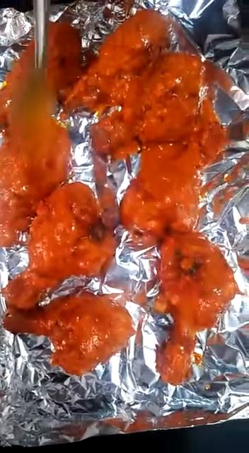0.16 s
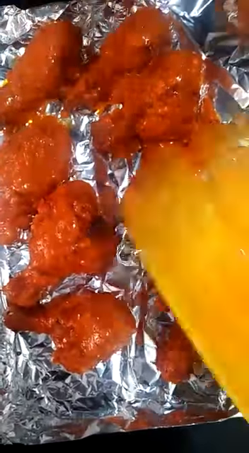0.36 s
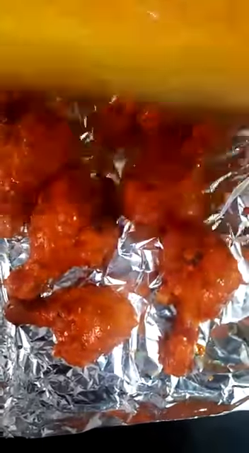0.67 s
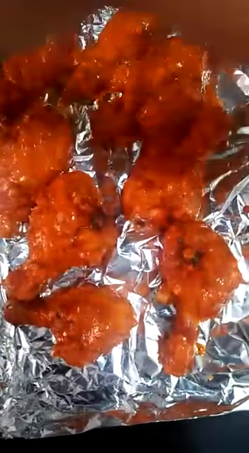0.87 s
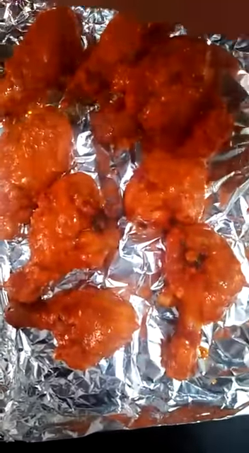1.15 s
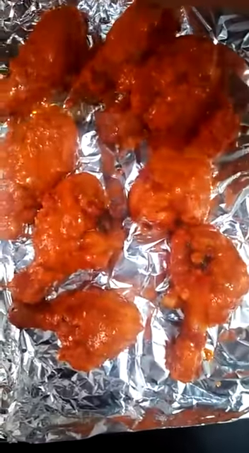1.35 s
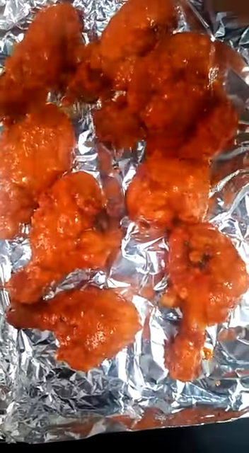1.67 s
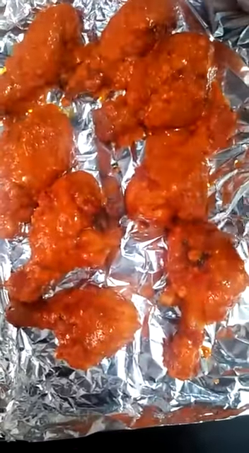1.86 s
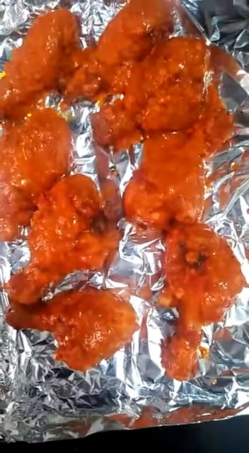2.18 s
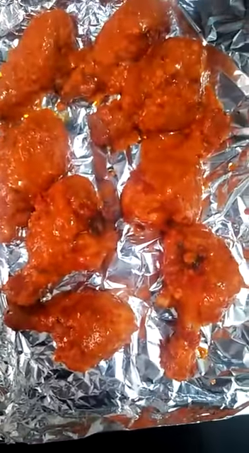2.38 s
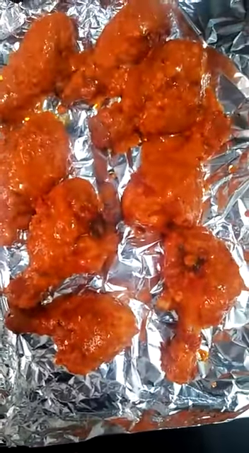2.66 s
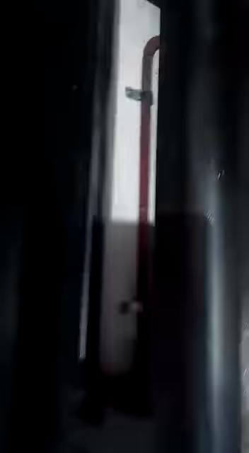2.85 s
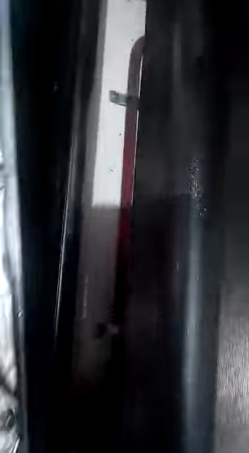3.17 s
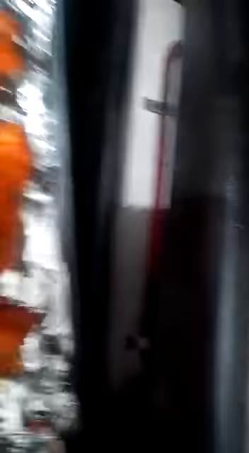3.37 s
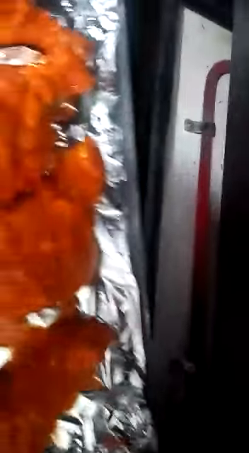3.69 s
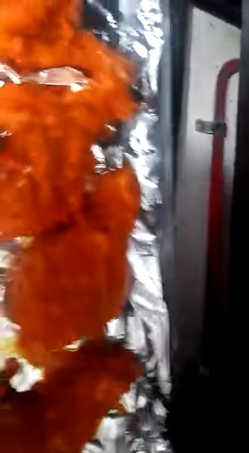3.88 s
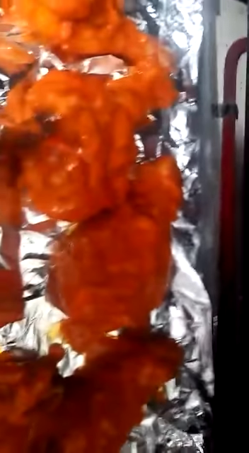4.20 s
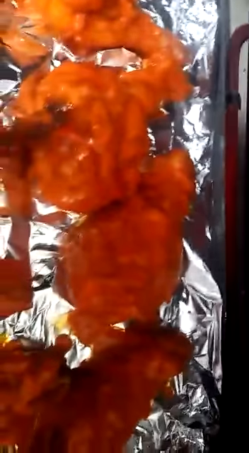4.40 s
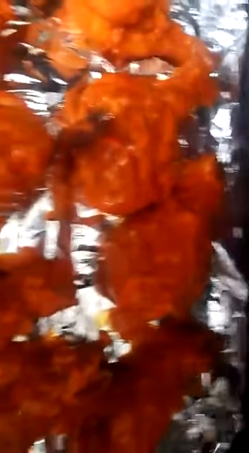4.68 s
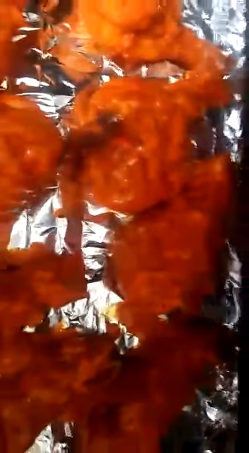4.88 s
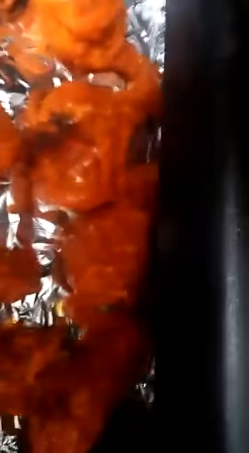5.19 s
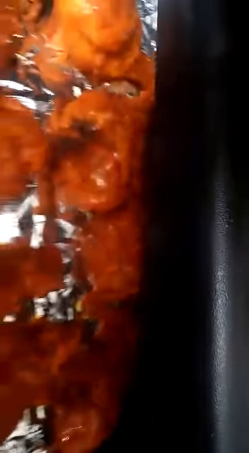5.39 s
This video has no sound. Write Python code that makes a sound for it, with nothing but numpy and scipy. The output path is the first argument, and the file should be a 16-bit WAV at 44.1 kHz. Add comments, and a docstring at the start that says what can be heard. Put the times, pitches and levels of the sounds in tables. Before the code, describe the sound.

First a bowl is put down and a metal spoon rattles against it in a quickening run of bright clinks, ending in a short skid. A soft pause with a faint swish follows. Then a foil-lined metal tray bumps the rack and is shoved into a hollow, booming oven, its foil crackling loudly. Hard kitchen walls reflect it; near, centred phone microphone.

```python
"""Over dull room noise and small ticks, a bowl is put down; a steel spoon clinks and both clatter and skid to rest.
After soft swishes and low bumps, a foil-lined tray knocks on the oven rack and is pushed in: the oven booms, the
tray scrapes, the foil crinkles and snaps. Short noise bursts and random slips excite resonances, decaying sines
add the ringing of bowl and spoon, and hard kitchen walls answer most of the sounds."""
import sys
import numpy as np
from scipy import signal
from scipy.fft import rfft, irfft, next_fast_len
from scipy.io import wavfile
from scipy.ndimage import uniform_filter1d

SR = 44100
rng = np.random.default_rng(int(sys.argv[2]) if len(sys.argv) > 2 else 0)


def file_out(sig):
    """Save sig as 16-bit WAV at sys.argv[1]."""
    # one column per channel
    cols = np.atleast_2d(sig).T
    # limit, then scale
    lim = np.clip(cols, -1, 1)
    pcm = np.round(lim * 32767).astype(np.int16)
    wavfile.write(sys.argv[1], SR, pcm)


N = 244534  # length of the scene in samples
T = np.arange(int(.7 * SR)) / SR  # time axis of one short sound, s

# ringing modes of the bowl: (frequency [Hz], level [dB], time to fall 60 dB at damping 1 [s])
BOWL_MODES = [(432, -2, .22), (456, 0, .22), (547, -7, .3), (582, -5, .36), (1806, -15, .35),
              (1839, -13, .42), (1915, -13, .4)]
# resonances of the oven's walls: (frequency [Hz], width [Hz], level [dB])
OVEN_MODES = [(54.4, 12, -24.5), (85.3, 22, -5), (137, 14, -4), (180.9, 14, 7.5), (244, 9.2, -3),
              (296, 40, -32), (433.3, 18, -11.5), (633, 340, -20)]
# the tray slides in, slows and is pushed on: (time [s], effort [dB])
PUSH_EFFORT = [(4.2, -66.5), (4.438, -54.5), (4.658, -56), (4.8, -53), (4.874, -46), (5.002, -52.5),
               (5.158, -66.5), (5.416, -54.5), (5.54, -50)]
# tone colour of crinkling foil: (frequency [Hz], level [dB])
FOIL_TONE = [(350, -59), (600, -7.5), (837, -7), (1020, 1), (1270, -29.5), (1470, -9), (1840, -7.5),
             (2560, -2.5), (4990, -7.5), (6780, 0), (14500, -10.5)]


def bowl():
    """The bowl touches softly, then lands with a hollow clonk and a clack of its rim."""
    # soft first touches just ahead of heavy blows: (time [s], level [dB])
    touches = [(0.664, -30.5), (1.3925, -40.5)]
    # the bowl is put down: (time [s], low level [dB], middle level [dB], treble level [dB]), before a trim
    landings = [(0.668, -25.5, -27.5, -32.5)]
    # resonances of the rim: (frequency [Hz], width [Hz], level [dB])
    rim = [(493, 540, -4.5), (885, 69, -8), (1110, 120, -12.5), (1845, 170, 1.5), (2340, 41, -32),
           (3466, 300, -4), (4930, 100, -4.5), (6340, 350, -4.5), (8400, 160, -20.5), (8600, 780, -15),
           (9500, 110, -22.5), (13300, 1100, -27)]
    out = np.zeros(N)
    for s, db in touches:
        swell = (1 - np.exp(-T / 0.001024)) * amp(-60 * T / 0.031)
        add(out, s, amp(db) * crest(np.sin(2 * np.pi * 500 * T) * swell))
    for s, *levels in landings:
        # one click plus a little chatter shakes the rim
        clack = resonate(signal.unit_impulse(len(T)) + 0.37 * burst(0.067), rim)
        hollow = crest(ring(BOWL_MODES, scatter_db=1, damping=1))
        hit = crest(kitchen(clack, wet_db=-0.5)) + amp(-6.5) * hollow
        hit = coloured(hit, [(120, -12.0), (330, -22), (420, 3.5)])
        add(out, s + 0.00096, amp(-0.9) * voiced(hit, levels))
    return out


def clatter():
    """Each contact knocks the dishes at a new spot, rebounds once and sets spoon and bowl ringing."""
    # contacts: (time [s], strength [dB], thud re strength [dB], steel edge re strength [dB]), before a trim
    contacts = [(0.799, -24.5, -10.5, 3.5), (0.83, -40, -8, 12.5), (1.347, -44.5, -19.5, -10),
                (1.394, -18.5, -0.5, -11), (1.423, -34.5, -5.5, -3), (1.446, -22.5, -8.5, -8),
                (1.631, -34.5, -20.5, -3.5), (1.714, -43, -4.5, -1.5), (1.726, -43, -14, 0),
                (1.772, -37, -16, -1), (1.794, -22.5, -32.5, -3), (1.855, -38, -8, -27),
                (1.867, -21.5, -21.5, -0.5), (1.922, -35, -8, 4), (1.98, -27.5, -23, -1.5),
                (2.014, -35, -2.5, -5), (2.057, -31, -3, -9), (2.092, -28, -2, -4.5), (2.114, -38.5, -2, 2)]
    # resonances of the dishes: (frequency [Hz], width [Hz], level [dB])
    dishes = [(201.5, 17, 4.5), (354, 30, 5.5), (447.4, 46, 13), (661, 40, -16.5), (812, 210, 7.5),
              (1450, 240, 6), (1475, 130, 5.5), (2026, 150, 4.5), (2413, 200, -1), (2950, 190, -6),
              (4070, 34, -3), (5347, 860, -4), (5990, 300, -26), (7780, 1400, -17), (9080, 500, -37.5),
              (11800, 1600, -20)]
    # ringing modes of the spoon: (frequency [Hz], level [dB], time to fall 60 dB at damping 1 [s])
    spoon = [(1270, -5, .3), (1323, -8, .3), (2476, -10, .25), (3020, -7, .15), (3823, -7, .25),
             (4613, -9, .3), (5028, -8, .22), (5163, -13, .3), (5545, -5, .26), (6228, -15, .3),
             (7168, 1, .24), (7854, -12, .2), (8586, -14, .25), (9486, -1, .24), (9786, -5, .26),
             (10420, -14, .2), (10900, -10, .13), (12150, -15, .2), (12745, -2, .18), (13960, -12, .12)]
    # the spoon's dense, quickly damped modes: (frequency [Hz], level [dB])
    clash_tone = [(400, -14.5), (800, -1), (1270, 11), (2000, 3), (2450, -9), (3050, 2), (3800, 2.5),
                  (5500, -1), (7500, -3), (10000, -3), (14000, -13)]
    rebound_s, rebound_db = 0.0092, -9  # each contact touches once more
    ring_base_db, ring_per_edge = -2.5, 0.17  # the spoon rings more when its edge takes the blow
    shine_per_edge = 0.61  # a sharper contact reaches further into the top octave
    out = np.zeros(N)
    for s, db, thud_db, edge_db in contacts:
        contact = burst(0.017)
        add(contact, rebound_s, amp(rebound_db) * burst(0.021))
        spot = patchy(contact, depth_db=3.5, size=12)
        knock = crest(coloured(resonate(spot, dishes), [(9500, 8.5), (13000, -9.5)]))
        ring_db = ring_base_db + ring_per_edge * edge_db
        clash = amp(ring_db - 4) * crest(coloured(burst(0.035), clash_tone))
        steel = amp(ring_db - 10.5) * crest(ring(spoon, scatter_db=7, damping=1.1))
        hollow = amp(-16) * crest(ring(BOWL_MODES, scatter_db=2, damping=.85))
        hit = kitchen(knock + clash, wet_db=-3.0) + steel + coloured(hollow, [(600, 0), (1700, 9.5)])
        hit = coloured(hit, [(7000, 0), (12500, shine_per_edge * edge_db + 1)])
        add(out, s + .0025, amp(-7.5) * voiced(hit, [db + thud_db, db, db + edge_db]))
    return coloured(out, [(70, -22), (140, -5.5), (240, -7.5), (330, -2.5), (450, -7.5), (640, 0.5),
                          (770, 5.5), (950, 0.5), (1230, 1.5), (1500, -1.5), (1900, 0.0)])


def skid():
    """The spoon rubs along the bowl; the dishes judder ever harder over the surface before they stop."""
    # the spoon rubs on the bowl: (start [s], stop [s], level [dB])
    rubs = [(1.315, 1.4, -52.5), (1.48, 1.5, -41.5)]
    # resonances of the rubbed spoon and bowl: (frequency [Hz], width [Hz], level [dB])
    rub_modes = [(1627, 55, 4), (1720, 180, -10), (2700, 44, -12.5), (3400, 110, -12.5), (5300, 380, -12),
                 (7540, 120, -11.5), (9610, 220, -18.5)]
    # the dishes skid: (start [s], stop [s], level at the start [dB])
    skid_move = (1.786, 2.11, -45)
    # tone colour of the skid: (frequency [Hz], level [dB])
    skid_tone = [(59, -53), (100, -38.5), (128, -9), (235, -6.5), (328, 2), (371, -43.5), (448, -18.5),
                 (738, 7), (1630, 2), (1920, 11), (4610, -15.5), (6170, -12), (7930, -20), (13300, -24.5),
                 (14500, -35)]
    squeak = resonate(grains(rate=2000, spread_db=0), rub_modes)
    squeak = unit(coloured(squeak, [(2000, -1), (4000, 1), (14000, -2.5)]))
    rub = strokes(rubs, rise_s=0.22, fall_s=0.083) * squeak
    # the grip tightens as they slow: 26 dB louder per second
    tightening = amp(26 * (np.arange(N) / SR - skid_move[0]))
    grip = strokes([skid_move], rise_s=0.53, fall_s=0.083) * tightening
    slips = grip * unit(coloured(grains(rate=2000, spread_db=5), skid_tone))
    return kitchen(rub + slips, wet_db=-2.5)


def tray():
    """The tray knocks on the wire rack, and its bumps boom and shudder in the oven's sheet walls."""
    # knocks on the rack: (time [s], low level [dB], middle level [dB], treble level [dB]), before a trim
    knock_times = [(3.57, -36, -32, -46.5), (3.703, -46.5, -54.5, -63.5), (3.933, -38.5, -45, -75),
                   (3.973, -56, -69, -75), (4.237, -48.5, -46.5, -48.5)]
    # resonances of the wire rack: (frequency [Hz], width [Hz], level [dB])
    rack = [(185, 30, 0), (270, 45, 3), (490, 40, -1), (595, 50, 1), (790, 70, -4), (1000, 150, -4),
            (1270, 120, 0), (1440, 90, -2), (1650, 120, -6), (1920, 200, -4), (2550, 250, -14),
            (6000, 3000, -23), (9500, 3000, -25)]
    # the oven's walls boom: (time [s], level before a trim [dB])
    boom_times = [(3.567, -28.5), (3.811, -37), (4.068, -27), (4.149, -37), (4.357, -31), (4.733, -41.5),
                  (4.976, -57), (5.235, -46)]
    shudder_db, shudder_t60_s = -9.5, 1  # the walls go on shaking after a bump
    knocks, booms = np.zeros(N), np.zeros(N)
    for s, *levels in knock_times:
        wires = coloured(resonate(burst(0.043), rack), [(270, -6.5), (600, 4.5), (1000, 3.5), (1500, -3)])
        add(knocks, s, amp(-3.5) * voiced(kitchen(wires, wet_db=1.5), levels))
    for s, db in boom_times:
        bump = burst(0.22) + amp(shudder_db) * burst(shudder_t60_s)
        add(booms, s, amp(db - 6) * crest(resonate(bump, OVEN_MODES), size=500))
    knocks = coloured(knocks, [(9000, 1), (13000, 0.5)])
    return knocks + coloured(booms, [(90, -1), (175, -4.5), (260, 1.5), (700, -5), (2500, -12.5)])


def push():
    """One effort drives the oven's uneven rumble, a gritty scrape in the tray's sheet and fine foil crinkling."""
    # resonances of the tray's sheet: (frequency [Hz], width [Hz], level [dB])
    sheet = [(640, 43, -20), (979, 42, 6.5), (1640, 190, -2), (2120, 340, -14), (2470, 73, -1),
             (4124, 90, -10.5)]
    # each point where the tray rides on the rack rings its sheet at another pitch: frequency ratios
    riding_points = [.8, 1, 1.1]
    rumble_db, scrape_db, crinkle_db = -8.5, -4.5, 0  # relative to the effort
    walls = resonate(grains(rate=170, spread_db=1.5), OVEN_MODES)
    walls = coloured(walls, [(85, 4.5), (175, -6), (260, 9.5), (700, -2.5), (2500, -30)])
    slips = sum(resonate(grains(rate=290, spread_db=4.5), np.multiply(sheet, [ratio, 1, 1]))
                for ratio in riding_points)
    grit = patchy(slips, depth_db=5, size=5)
    creases = coloured(facets(rate=2400, life=.0016, spread_db=4.5), FOIL_TONE)
    sliding = amp(scrape_db) * unit(grit) + amp(crinkle_db) * unit(creases)
    drive = effort()
    return amp(rumble_db) * drive * unit(walls) + kitchen(drive * sliding, wet_db=-2.5)


def effort():
    """How hard the tray is moved: a few shoves, then the long slide."""
    # short shifts of the tray before it slides: (start [s], stop [s], effort [dB])
    shoves = [(3.58, 3.595, -63.5), (3.965, 3.97, -63), (4.075, 4.1, -46.5)]
    return strokes(shoves, rise_s=0.16, fall_s=0.087) + gains(PUSH_EFFORT)[0]


def foil():
    """Large creases buckle with sharp snaps, lesser ones at random while the tray slides; a few light ticks."""
    # the loudest snaps: (time [s], level before a trim [dB], treble brightness before an offset [dB])
    loud_snaps = [(4.076, -40, -2), (4.278, -29.5, -8), (4.364, -31.5, 5), (4.617, -22.5, -12.5),
                  (4.637, -34.5, -17), (4.699, -30, -11), (4.726, -20.5, -11.5), (4.751, -21.5, -3),
                  (4.779, -25.5, -11), (4.846, -20.5, -12.5), (4.899, -31.5, -18), (4.988, -26, -5.5),
                  (5.114, -39.5, 6), (5.144, -40, 0), (5.186, -34.5, 6), (5.516, -24.5, -7)]
    # small light ticks: (time [s], level before a trim [dB])
    tick_times = [(0.2916, -45.5), (0.3165, -53), (0.521, -46), (1.2961, -35.5), (1.309, -42.5),
                  (3.1341, -54)]
    small_count, small_db, small_spread_db = 24, 8, 3  # lesser snaps; level relative to the effort
    snaps, ticks = np.zeros(N), np.zeros(N)
    for s, db, bright_db in loud_snaps:
        add(snaps, s + 0.00061, amp(db - 9.5) * snap(bright_db))
    for s, db in tick_times:
        tick = coloured(burst(0.0074), [(3000, -25.5), (6500, 3), (13000, 2.5)])
        add(ticks, s, amp(db - 6) * crest(tick))
    drive = effort()
    for when, size, colour in rng.uniform(-1, 1, (small_count, 3)):
        at = int(np.interp(when, [-1, 1], [PUSH_EFFORT[0][0] * SR, N - 1]))
        level = drive[at] * amp(small_db + small_spread_db * size)
        add(snaps, at / SR, level * snap(-4 + 9 * colour))
    return kitchen(snaps, wet_db=-2) + kitchen(ticks, wet_db=-1)


def snap(bright_db):
    """One crease buckles: a short burst of noise with a foil colour of its own."""
    buckle = patchy(burst(.04)[:SR // 8], depth_db=4, size=8)
    return crest(coloured(coloured(buckle, FOIL_TONE), [(1500, 0), (6000, bright_db + 2)]))


def facets(rate, life, spread_db):
    """Small facets of foil flip over, each with a short ring at its own pitch."""
    draws = rng.random((int(rate * N / SR), 4))  # random (moment, pitch, size, life) of each facet
    t = T[:280]
    hz = 2000 + 12500 * draws[:, 1:2]
    size = amp(-spread_db * np.log(.01 + draws[:, 2:3]))
    decay = np.exp(-t / (life * (.1 + draws[:, 3:])))
    pings = size * np.sin(2 * np.pi * hz * t) * decay
    at = (draws[:, :1] * N).astype(int) + np.arange(len(t))
    return np.bincount(at.ravel(), pings.ravel(), N)[:N]  # sums overlapping pings


def background():
    """Dull wavering room noise with faint narrow swells, soft swishes and low bumps of handling."""
    # room noise: (time [s], level [dB])
    air = [(0, -61.5), (0.7, -57.5), (1.05, -62), (1.4, -58.5), (2.3, -61.5), (3.4, -64), (5.54, -63)]
    # tone colour of the room noise: (frequency [Hz], level [dB])
    air_tone = [(25, -14), (80, -10), (180, -10.5), (235, -21.5), (310, -5.5), (378, -23.5), (455, -5.5),
                (600, -5), (1000, -5.5), (1400, -7.5), (1920, -14.5), (2860, -25.5), (4500, -29.5),
                (14500, -32.5)]
    # faint narrow swells: (middle [s], half length [s], frequency [Hz], level [dB])
    swells = [(0.145, 0.34, 1368, -61), (0.548, 0.012, 970, -55), (2.64, 0.034, 804, -59),
              (2.7, 0.056, 1543, -58.5), (3.16, .045, 331, -61), (3.382, 0.018, 2125, -59)]
    # soft swishes: (start [s], stop [s], level [dB])
    swishes = [(2.995, 3.02, -52.5), (3.12, 3.2, -69.5), (3.38, 3.42, -61)]
    # tone colour of the swishes: (frequency [Hz], level [dB])
    swish_tone = [(880, -44.5), (1500, 3), (1810, -8), (2110, 0.5), (3240, -10), (4470, -5), (8440, -2),
                  (14500, -8)]
    # dull bumps as things are moved: (time [s], frequency [Hz], level [dB])
    bumps = [(2.031, 180, -54), (2.093, 118, -53.5), (2.98, 74, -53.5)]
    t = np.arange(N) / SR
    hiss = coloured(rng.standard_normal(N), air_tone)
    out = gains(air)[0] * unit(patchy(hiss, depth_db=3.5, size=14))
    for s, length, hz, db in swells:
        band = [(hz, 110, 0)]
        tone = unit(resonate(resonate(rng.standard_normal(N), band), band))
        out += amp(db) * np.exp(-((t - s) / length) ** 2) * tone
    swish = unit(coloured(rng.standard_normal(N), swish_tone))
    out += strokes(swishes, rise_s=0.13, fall_s=0.27) * swish
    for s, hz, db in bumps:
        thump = [(hz, 50, 0)]
        add(out, s, amp(db) * crest(resonate(resonate(burst(0.055), thump), thump), size=500))
    return out


def kitchen(x, wet_db, build=0.0007):
    """x with the answer of hard walls, each frequency dying at its own speed."""
    # how long the room rings: (frequency [Hz], time to fall 60 dB [s])
    wall_times = [(150, 0.64), (400, 0.43), (1000, 0.41), (3000, 0.32), (7000, 0.42), (14000, 0.38)]
    hz, t, z = signal.stft(rng.standard_normal(len(T)), SR, nperseg=256)
    fade = amp(-60 * t / along(wall_times, hz)[:, None])
    tail = signal.istft(z * fade, SR, nperseg=256)[1][:len(T)]
    tail = tail * (1 - np.exp(-T / build))  # the answer builds up within about a millisecond
    return x + amp(wet_db) * signal.fftconvolve(x, tail / np.linalg.norm(tail))[:len(x)]


def burst(t60):
    """The brief chatter of two surfaces meeting: noise that falls 60 dB in t60 seconds."""
    return rng.standard_normal(len(T)) * amp(-60 * T / t60)


def grains(rate, spread_db):
    """Random tiny slips, rate per second; a larger spread makes a few much stronger than the rest."""
    sizes = amp(spread_db * np.minimum(rng.exponential(size=N), 4))
    return (rng.random(N) < rate / SR) * sizes * rng.standard_normal(N)


def ring(modes, scatter_db, damping):
    """A struck body rings as a sum of decaying sines, at new strengths for each blow."""
    total = 0
    for hz, db, t60 in modes:
        level = amp(db + scatter_db * rng.normal() - 60 * damping * T / t60)
        total = total + level * np.sin(2 * np.pi * (hz * T + rng.random()))
    return total


def voiced(hit, levels_db, size=1300):
    """Where and how hard a thing is struck sets the strength of its low, middle and high modes."""
    # low, middle and high range: (from [Hz], to [Hz])
    ranges = [(100, 900), (900, 3000), (3000, 14000)]
    power = 2 * np.abs(rfft(hit[:size]) / size) ** 2
    hz = np.fft.rfftfreq(size, 1 / SR)
    lifts = []
    for db, (lo, hi) in zip(levels_db, ranges):
        lifts.append(db - 10 * np.log10(power[(hz > lo) & (hz < hi)].sum()))
    return coloured(hit, list(zip([700, 1150, 2400, 3800], np.repeat(lifts, 2)[1:-1])))


def patchy(x, depth_db, size):
    """x with drifting patches of stronger and weaker frequencies."""
    z = signal.stft(x, nperseg=512)[2]
    field = uniform_filter1d(uniform_filter1d(rng.standard_normal(z.shape), 4, 0), size, 1)
    return signal.istft(z * amp(depth_db * unit(field)), nperseg=512)[1][:len(x)]


def strokes(rows, rise_s, fall_s):
    """Gain of (start [s], stop [s], level [dB]) movements: each swells, holds and dies, 60 dB per rise or fall."""
    t = np.arange(N) / SR
    total = 0
    for start, stop, db in rows:
        distance = np.maximum(start - t, 0) / rise_s + np.maximum(t - stop, 0) / fall_s
        total = total + amp(db - 60 * distance)
    return total


def gains(rows):
    """One gain per sample for each dB column, nearly silent outside the rows."""
    s, *cols = np.transpose(rows)
    return [amp(np.interp(np.arange(N) / SR, s, c, left=-120, right=-120)) for c in cols]


def resonate(x, body):
    """x through the resonances of a body: (frequency [Hz], width [Hz], level [dB])."""
    return filtered(x, lambda f: sum(amp(db) * 1j * f * w / (c * c - f * f + 1j * f * w) for c, w, db in body))


def coloured(x, spectrum):
    """x through a tone colour: (frequency [Hz], level [dB])."""
    return filtered(x, lambda hz: amp(along(spectrum, hz)))


def filtered(x, response):
    """x times a complex response of frequency."""
    m = next_fast_len(len(x) + SR // 4)
    return irfft(rfft(x, m) * response(np.fft.rfftfreq(m, 1 / SR)), m)[:len(x)]


def along(points, hz):
    """Values between (frequency [Hz], value) points, on a log frequency axis."""
    f, v = np.transpose(points)
    return np.interp(np.log(hz + 1), np.log(f + 1), v)


def amp(db):
    """Decibels to gain."""
    return 10 ** (np.asarray(db) / 20)


def unit(x):
    """Scale to an rms (average strength) of 1."""
    return x / np.sqrt(np.mean(x ** 2) + 1e-20)


def crest(x, size=130):
    """Scale so that the loudest few milliseconds have rms 1."""
    return x / np.sqrt(uniform_filter1d(x ** 2, size).max())


def add(track, s, x):
    """Mix x into the track at s seconds."""
    part = track[round(s * SR):][:len(x)]
    part += x[:len(part)]


def suppress(x, threshold_db):
    """Noise suppression: treble that sinks under a threshold is turned down."""
    hz, _, z = signal.stft(x, SR, nperseg=512)
    power = np.abs(uniform_filter1d(uniform_filter1d(np.abs(z) ** 2, 25, axis=-2), 3, axis=-1))
    keep = np.maximum(power / (power + amp(threshold_db) ** 2), .4)
    share = np.clip(hz / 1000 - 2, 0, 1)[:, None]  # none below 2 kHz, full above 3 kHz
    return signal.istft(z * keep ** share, SR, nperseg=512)[1][:, :N]


def scene():
    """Everything is centred; only the treble spreads a little, by a side signal of wandering strength and sign."""
    mid = bowl() + clatter() + skid() + tray() + push() + foil() + background()
    # (frequency [Hz], side level [dB])
    spread = [(2600, -80), (3400, -36), (4600, -14), (8000, -7), (13000, -13)]
    wander = np.sin(np.cumsum(rng.normal(0, .03, N)))
    side = filtered(mid * wander, lambda hz: 1j * amp(along(spread, hz)))  # 1j: a quarter turn of phase
    return np.array([mid + side, mid - side])


def record(dry):
    """The phone turns down faint hiss, drops the deepest bass and cuts off steeply above its band limit."""
    top_hz = 14420
    quiet = suppress(dry, threshold_db=-89)

    def band(hz):
        """Gain of the phone: weak deep bass, a steep upper edge."""
        bass_cut = hz ** 2 / (hz ** 2 + 35 ** 2)
        return bass_cut / np.sqrt(1 + (hz / top_hz) ** 200)

    return np.array([filtered(x, band) for x in quiet])


dry = scene()
out = record(dry)
file_out(out)
```